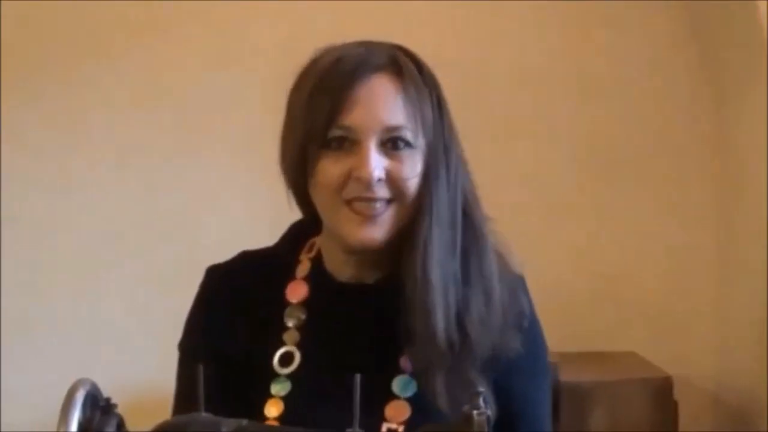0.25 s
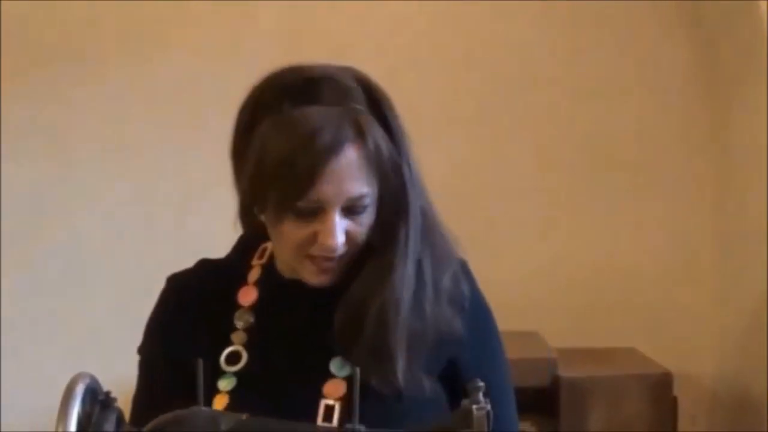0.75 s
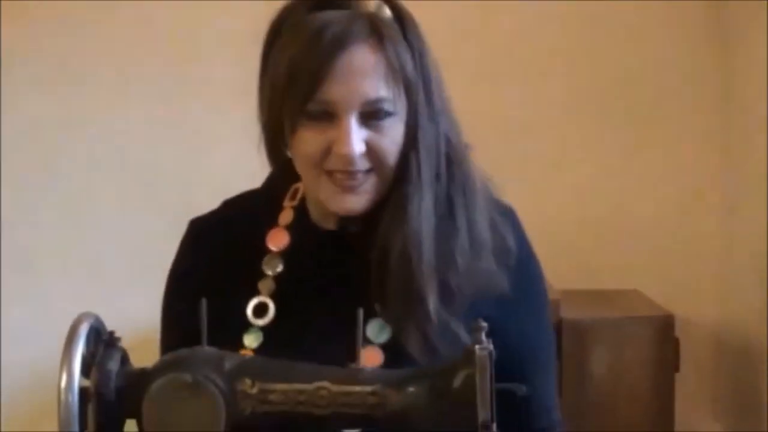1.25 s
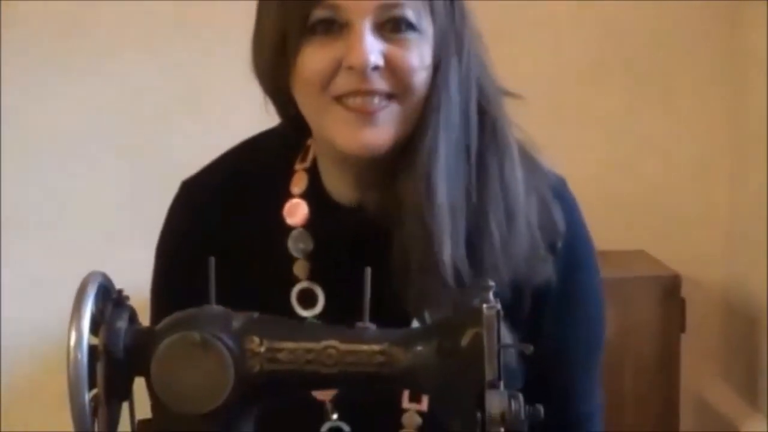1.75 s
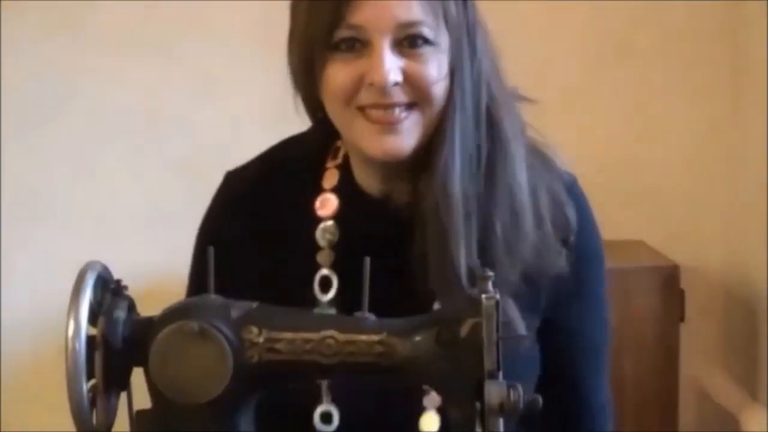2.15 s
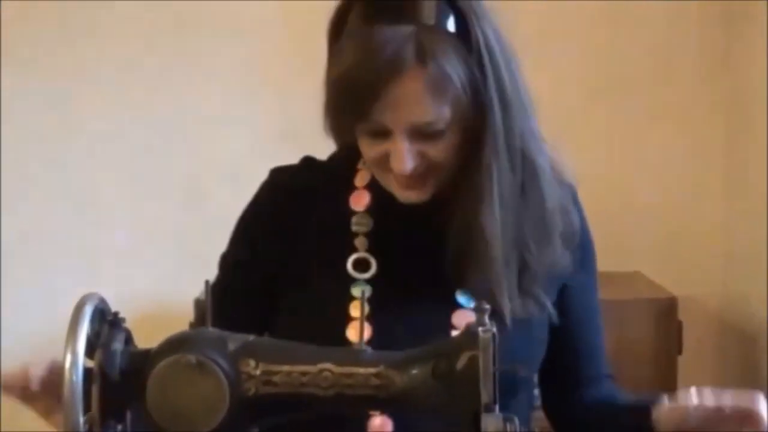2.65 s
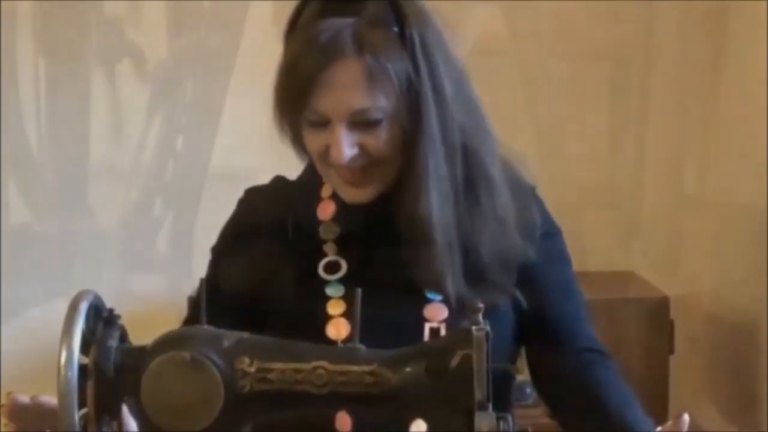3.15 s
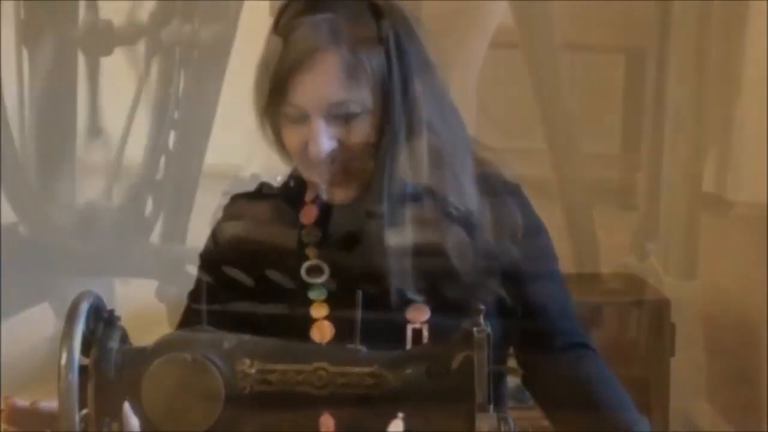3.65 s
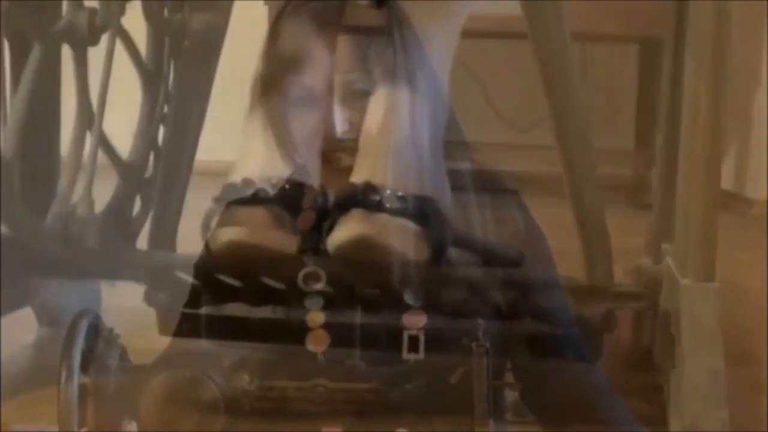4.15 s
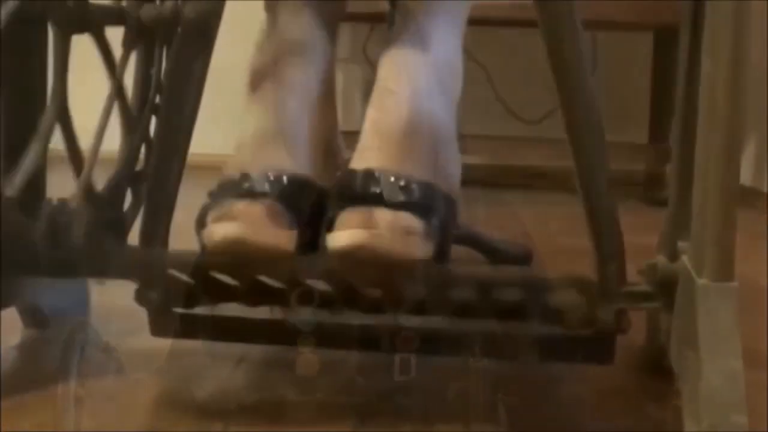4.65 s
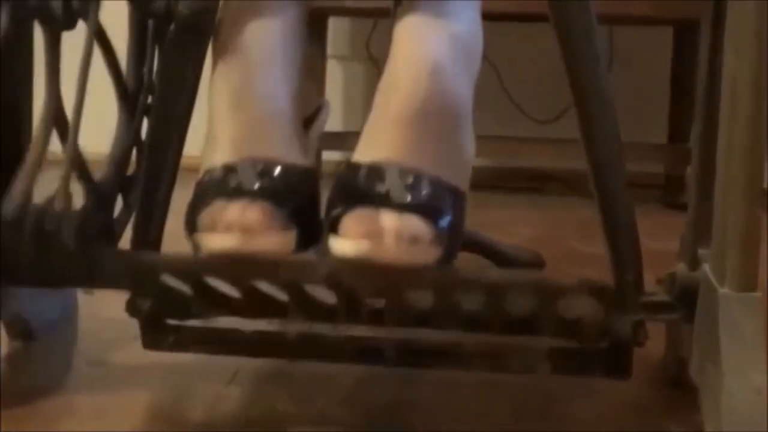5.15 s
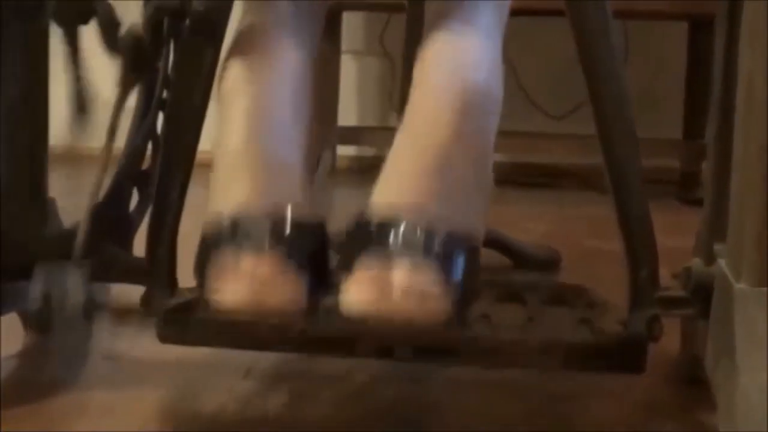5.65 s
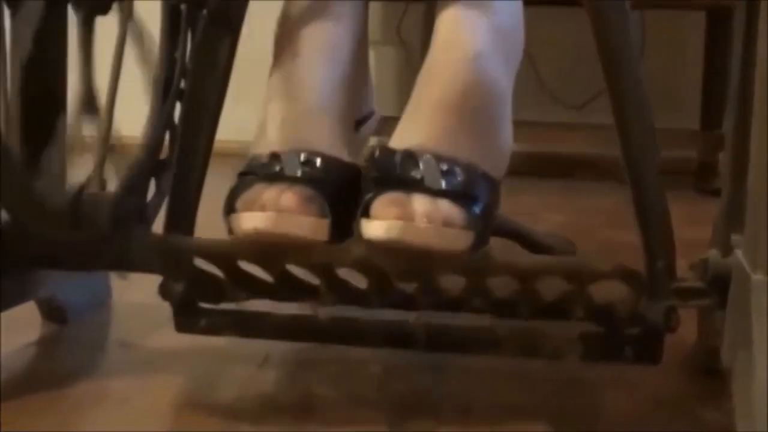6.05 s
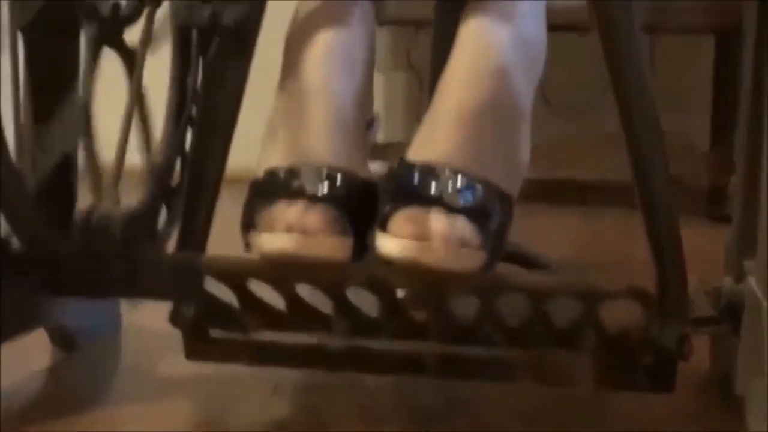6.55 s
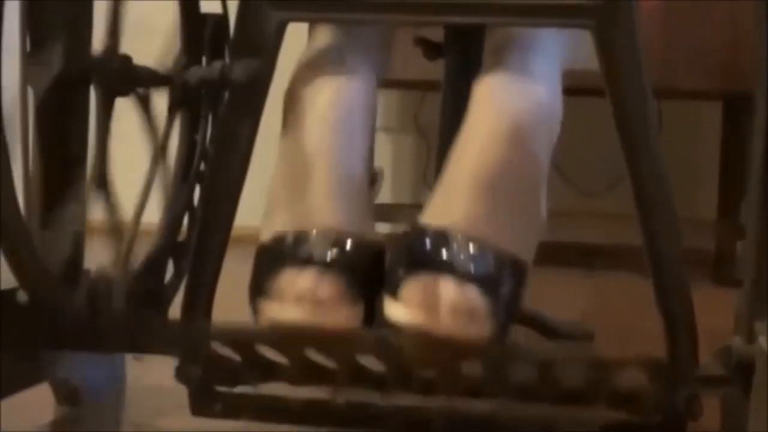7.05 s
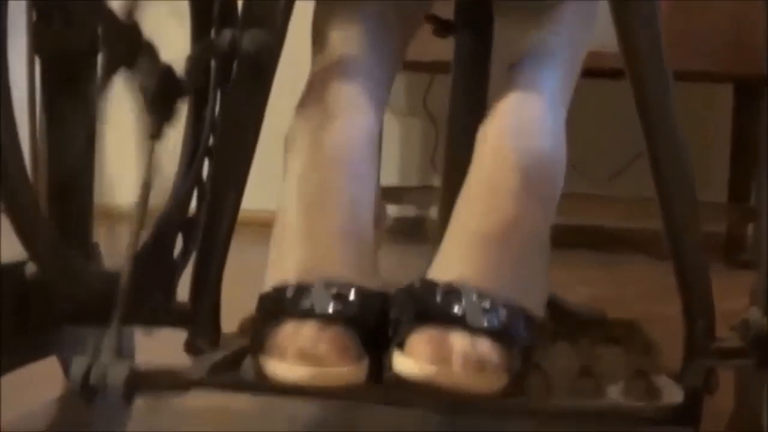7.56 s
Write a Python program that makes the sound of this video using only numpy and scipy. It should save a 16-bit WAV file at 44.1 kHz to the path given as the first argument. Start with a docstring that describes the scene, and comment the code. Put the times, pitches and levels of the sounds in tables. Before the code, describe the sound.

An old treadle sewing machine knocks and clanks as it is handled, then is pedalled with slow, ringing iron knocks in an echoing room.

```python
"""An old cast-iron treadle sewing machine in a bare, echoing room, on a small camera's stereo microphone.
The head is handled first: it drops and rebounds on the wooden table, steel parts slide, a lever snaps
and rings. Then the feet rock the treadle: once a stroke its loose linkage touches, knocks, rebounds and
swings back with a thud. Every heavy blow shakes the frame, which rumbles on for a moment.
The microphone is far enough off to hear the room answer each blow."""
import sys
import numpy as np
from scipy import signal
from scipy.fft import rfft, irfft, next_fast_len
from scipy.io import wavfile
from scipy.ndimage import uniform_filter1d, minimum_filter1d, map_coordinates

SR = 44100
rng = np.random.default_rng(int(sys.argv[2]) if len(sys.argv) > 2 else 0)


def inscribe(sig):
    """Save sig as 16-bit PCM at rate SR to the path in sys.argv[1].

    A 1-D sig is mono; a 2-D sig holds one channel per row.
    Samples are clipped to [-1, 1] before scaling.
    """
    pcm = np.round(np.clip(np.atleast_2d(sig).T, -1, 1) * 32767)
    wavfile.write(sys.argv[1], SR, pcm.astype(np.int16))


N = 343980
NOW = np.arange(N) / SR  # seconds through the scene
T = np.arange(SR) / SR  # seconds through one event
HZ = np.fft.rfftfreq(2 * SR, 1 / SR)
RUN_START_S = 4.85  # the treadle starts to move


def amp(db):
    """Decibels to gain."""
    return 10 ** (np.asarray(db) / 20)


def unit(x):
    """Scale to rms 1."""
    return x / np.sqrt(np.mean(x ** 2) + 1e-20)


def along(points, hz):
    """(Hz, value) points read on a log axis."""
    point_hz, values = np.transpose(points)
    return np.interp(np.log(hz + 1), np.log(point_hz + 1), values)


def fade(t60):
    """One second of exponential decay, falling 60 dB in t60 seconds."""
    return np.exp(-np.log(1000) * T / t60)


def swell(start, end, ramp):
    """0 to 1 and back: rises from start and falls from end, each over ramp seconds."""
    return np.clip((NOW - start) / ramp, 0, 1) - np.clip((NOW - end) / ramp, 0, 1)


def add(out, s, x):
    """Mix x into out from time s on."""
    part = out[:, round(s * SR):][:, :x.shape[-1]]
    part += x[..., :part.shape[1]]


def coloured(x, gain):
    """Causal filter of unit power, shaped by gain on the HZ grid."""
    cepstrum = irfft(np.log(np.maximum(unit(gain), 1e-6)))
    cepstrum[1:SR] *= 2  # folding the cepstrum gives minimum phase
    cepstrum[SR + 1:] = 0
    return irfft(rfft(x, 2 * SR) * np.exp(rfft(cepstrum)))[..., :SR]


# The room's width at the microphone. Each row: frequency in Hz, side relative to mid in dB.
ROOM_WIDTH = [(25, -13), (60, -35), (130, -43), (280, -29), (1000, -7.5), (4000, -5), (10000, -7.5)]
def diffuse(size):
    """Stereo noise from all round the room, nearly mono in the bass."""
    mid, side = rfft(rng.standard_normal((2, size)))
    side = side * amp(along(ROOM_WIDTH, np.fft.rfftfreq(size, 1 / SR)))
    return irfft(np.array([mid + side, mid - side]), size)


def steady(spectrum):
    """Steady stereo noise of rms 1, shaped by (Hz, dB) points."""
    gain = amp(along(spectrum, np.fft.rfftfreq(N, 1 / SR)))
    return unit(irfft(rfft(diffuse(N)) * gain, N))


# The echo of the bare room. Each row: frequency in Hz, t60 in seconds.
ROOM_DECAY = [(80, 1), (210, 0.56), (560, 0.54), (1470, 0.55), (3880, 0.61), (10000, 0.39)]
def room_tail(build_cycles):
    """The room's answer: each frequency dies at its own speed, and the bass builds slowest."""
    hz, t, noise = signal.stft(diffuse(SR), SR, nperseg=256)
    decay = np.exp(-np.log(1000) * t / along(ROOM_DECAY, hz)[:, None])
    onset = 1 - np.exp(-t * np.maximum(hz, 100)[:, None] / build_cycles)
    return signal.istft(noise * decay * onset, SR, nperseg=256)[1][:, :SR]


def ripple(spacing_hz):
    """A body's countless weak resonances: a random curve over frequency."""
    return map_coordinates(rng.standard_normal(2000), [HZ / spacing_hz], mode="nearest")


def blows(contacts, spectrum, modes, contact_t60, build_cycles, ripple_db, knee_hz):
    """Each contact shakes a body briefly and fills the room; a harder one is brighter above the knee."""
    out = np.zeros((2, N))
    resonances_db = sum(db / (1 + (2 * (HZ - hz) / width) ** 2) for hz, width, db, *_ in modes)
    body_db = along(spectrum, HZ) + resonances_db + ripple_db * ripple(45.21) * HZ / (HZ + 700)
    octaves = np.log2(np.maximum(HZ / knee_hz, 1))
    hollow_hz, hollow_octaves = 634, 0.42  # the band lifted by a blow on the middle of a panel
    hollow = np.exp(-(np.log2((HZ + 1) / hollow_hz) / hollow_octaves) ** 2)
    for s, db, direct_db, hollow_db, brightness in contacts:
        direct = amp(direct_db) * fade(contact_t60) * rng.standard_normal(SR)
        colour = amp(body_db + hollow_db * hollow + brightness * octaves)
        add(out, s, amp(db) * coloured(direct + room_tail(build_cycles), colour))
    return out


def rebounds(s, db, hollow_db, brightness, flight_s, loss_db, direct_db, dulling, touch_s, touch_db):
    """Contacts of a loose blow: a light touch, the hit, then two ever quicker, weaker, duller rebounds."""
    shrink = .68  # each flight over the one before
    contacts = [(s - touch_s, db + touch_db, direct_db, hollow_db, brightness - dulling)]
    for k in range(3):
        contacts.append((s, db - k * loss_db, direct_db, hollow_db, brightness - k * dulling))
        s += flight_s * shrink ** k
    return contacts


# Room tone and hiss around the microphone. Each row: frequency in Hz, relative level in dB.
AIR_SPECTRUM = [(12, -63), (20, -14), (85, 6.5), (174, -2), (210, 6.5), (239, 4.5), (1140, -5.5),
                (2320, -11.5), (2570, -11), (3100, -19), (3350, -10.5), (4030, -16), (9640, -39),
                (11000, -48.5), (14300, -73), (22000, -120)]
HISS_SPECTRUM = [(500, -15), (2000, 6.5), (5000, 1), (9500, 3.5), (11000, 0)]
def background(air_db=-58, hiss_db=-63, whine_db=-64, pip_period_s=.04, pip_width_s=0.0048):
    """Room air, a hiss that comes and goes, and a faint electrical whine pulsing 25 times a second."""
    from_pip_s = (NOW + .009) % pip_period_s - pip_period_s / 2
    pips = np.exp(-(from_pip_s / pip_width_s) ** 2 / 2)
    whine = steady([(2300, -64), (2560, -5), (2660, -10.5), (2850, -30),
                    (3200, -25), (3380, -7), (3600, -50)])
    whine_gain = amp(whine_db + 6 * swell(start=0.25, end=6.3, ramp=.15))
    hiss_gain = amp(hiss_db + 8 * swell(start=1.16, end=3.7, ramp=0.067))
    air = amp(air_db) * steady(AIR_SPECTRUM)
    return air + hiss_gain * steady(HISS_SPECTRUM) + whine_gain * pips * whine


# The frame's rumble and the deep bass under it. Each row: frequency in Hz, relative level in dB.
FRAME_SPECTRUM = [(25, -22), (60, -15.5), (110, -4), (180, -11.5), (280, 1), (450, -13), (900, -15.5),
                  (3000, -33)]
DEEP_SPECTRUM = [(20, 3), (38, -5), (60, 6.5), (90, -23), (200, -37)]
def frame_rumble(knock_shake_db=-24, stroke_shake_db=-32, settle_db_per_s=22, deep_floor_db=-72):
    """The frame rumbles while it is shifted, after every heavy blow, and while the flywheel turns."""
    jolts = [(s, db + knock_shake_db) for s, db, *_ in HEAD_KNOCKS]
    jolts += [(s, db + stroke_shake_db) for s, db, *_ in TREADLE_STROKES]
    jolt_power = sum((NOW > s) * amp(db - settle_db_per_s * np.abs(NOW - s)) ** 2 for s, db in jolts)
    handled = amp(-54) * swell(start=-1, end=0.57, ramp=0.27)
    running = amp(-56) * swell(start=RUN_START_S, end=NOW[-1], ramp=0.17)
    motion = np.sqrt(jolt_power + handled ** 2 + running ** 2)
    deep_gain = np.hypot(amp(-8) * motion, amp(deep_floor_db))
    return motion * steady(FRAME_SPECTRUM) + deep_gain * steady(DEEP_SPECTRUM)


# Small loose parts, sounding close and dry. Each row: start in seconds, level in dB, pitch in Hz.
PART_CLICKS = [(0.310, -35, 2530), (0.314, -26, 3900), (1.704, -25.5, 4170), (2.299, -22, 4040),
               (2.308, -16.5, 7400), (4.935, -40.5, 4870), (5.2331, -19.5, 3330), (5.2345, -26, 8800),
               (5.4785, -23.5, 3900), (6.5005, -17.5, 5200), (6.801, -30, 3900), (7.105, -17.5, 3370)]
def clicks(t60=0.03, room_db=-30):
    """Loose parts click: short bursts that fall away above their pitch, with hardly any room."""
    out = np.zeros((2, N))
    for s, db, hz in PART_CLICKS:
        spectrum = [(300, -25), (800, -1), (hz * 1.14, -3), (hz * 1.18, 0), (hz * 1.53, -16), (12500, -23)]
        snap = fade(t60) * rng.standard_normal(SR)
        echo = amp(room_db) * room_tail(build_cycles=2)
        add(out, s, amp(db) * coloured(snap + echo, amp(along(spectrum, HZ))))
    return out


# Feet and treadle plate, down by the floor.
# Each row: start in seconds, level in dB, brightness in dB per octave, boom pitch in Hz.
FOOT_THUDS = [(0.403, -28.5, -2, 159), (0.495, -38.5, 3.5, 252), (1.297, -46.5, 3.5, 330),
              (1.962, -23, 1, 200), (3.089, -38, 2, 322), (3.485, -38.5, -0.5, 202),
              (4.303, -38.5, 2.5, 101), (4.855, -36.5, -1, 255), (4.970, -32.5, 2.5, 265),
              (5.028, -25.5, 1, 108), (6.311, -41.5, -2, 260), (7.237, -33, 1, 266), (7.763, -38.5, 3, 267)]
# The colour of a soft blow. Each row: frequency in Hz, relative level in dB.
THUD_SPECTRUM = [(40, -27.5), (80, -12), (140, -5), (270, -3.5), (400, -4), (600, -18), (1200, -32),
                 (4000, -50), (11000, -62)]
# The wooden table's modes. Each row: frequency in Hz, width in Hz, lift in dB.
TABLE_MODES = [(197, 98, 5), (269, 14.7, 6), (351.2, 5.8, 9.5), (634, 13, 0), (760, 74, 1), (1430, 54, 1.5),
               (1830, 37, -11)]
def thuds(backswing_s=.318, plate_direct_db=4, plate_brightness=-0.84):
    """Feet thud on the treadle, and so does its plate as it swings back after each stroke."""
    feet = [(s, db, 0, 0, brightness) for s, db, brightness, _ in FOOT_THUDS]
    plate = [(s + backswing_s, db, plate_direct_db, 0, plate_brightness) for s, *_, db in TREADLE_STROKES]
    return blows(feet + plate, THUD_SPECTRUM, TABLE_MODES,
                 contact_t60=0.038, build_cycles=0.99, ripple_db=5.5, knee_hz=100)


def table_booms(t60=0.17, rise_s=0.0037, room_db=-15, thud_boom_db=2.5, lever_kick=(2.385, -11, 403)):
    """Knocks, thuds and the lever's kick each swing the tabletop at one low pitch; the room takes it up."""
    out = np.zeros((2, N))
    swings = [(s, db, hz) for s, *_, db, hz in HEAD_KNOCKS]
    swings += [(s, db + thud_boom_db, hz) for s, db, _, hz in FOOT_THUDS]
    for s, db, hz in swings + [lever_kick]:
        swing = fade(t60) * (1 - np.exp(-T / rise_s)) * np.sin(2 * np.pi * hz * T)
        band = 1 / (1 + (4 * (HZ / hz - 1)) ** 4)
        echo = coloured(room_tail(build_cycles=0.26), band)
        add(out, s, amp(db) * (swing + amp(room_db) * echo))
    return out


# Hands and sleeves on the machine. Each row: middle in seconds, half length in seconds, level in dB.
SLEEVE_BRUSHES = [(0.85, 0.046, -47), (1.248, 0.047, -65), (1.44, 0.093, -49), (2.933, 0.039, -48)]
# The colour of rubbing cloth. Each row: frequency in Hz, relative level in dB.
CLOTH_SPECTRUM = [(500, -18), (2000, 0), (5000, -5), (8500, -0.5), (11000, -2.5)]
def brushes(grain_db=3):
    """Cloth rubs over the iron: a grainy hiss that swells and fades with each movement."""
    pressure = sum(amp(db) * np.exp(-((NOW - s) / half) ** 2) for s, half, db in SLEEVE_BRUSHES)
    grain = amp(grain_db * unit(uniform_filter1d(rng.standard_normal(N), size=200)))
    return pressure * unit(grain * steady(CLOTH_SPECTRUM))


# The head landing on the tabletop. Each row: start in seconds, level in dB, hollowness in dB, brightness
# in dB per octave, first flight in seconds, loss per rebound in dB, boom level in dB, boom pitch in Hz.
HEAD_KNOCKS = [(0.838, -22.5, 10.5, -0.5, 0.032, 8, -19.5, 259.5),
               (1.446, -26, 8.5, -6, 0.051, 4.5, -30, 274), (1.607, -18, 1.5, -5, 0.036, 5, -13, 260),
               (2.210, -26, 3, -0.5, 0.034, 2, -13, 128), (2.313, -15, 4.5, 3.2, 0.051, 2.5, -11, 155.4),
               (6.643, -23, 5.5, -4.5, 0.034, 15, -13.5, 501)]
# The colour of struck wood. Each row: frequency in Hz, relative level in dB.
WOOD_SPECTRUM = [(29, -72), (50, -41), (126, -9), (266, -0.5), (436, -3.5), (878, -9.5), (1100, -14.5),
                 (1770, -14), (1940, -15), (3480, -30.5), (5850, -45), (8020, -40), (11000, -61.5),
                 (14300, -53), (22000, -120)]
def head_knocks():
    """The head drops on its wooden table and rebounds."""
    contacts = []
    for *knock, _, _ in HEAD_KNOCKS:
        contacts += rebounds(*knock, direct_db=5.5, dulling=0.99, touch_s=0.022, touch_db=-21)
    return blows(contacts, WOOD_SPECTRUM, TABLE_MODES,
                 contact_t60=0.08, build_cycles=3.3, ripple_db=3.0, knee_hz=565)


# Hollow taps, and the lever's clank at 2.365 s. Each row: start in seconds, level in dB, lift of the
# direct sound at the microphone in dB, brightness in dB per octave.
TAPS_AND_CLANK = [(1.4466, -30, 13, -2), (2.365, -31, 7, 6), (3.3233, -29, 15, -1.3), (4.077, -44, 11, -1),
                  (4.244, -39.5, 1.5, 4), (5.023, -44, 20.5, 1), (7.418, -38.5, 10.5, -3.5),
                  (7.490, -40.5, 12.5, 2.5)]
# Their hollow colour. Each row: frequency in Hz, relative level in dB.
HOLLOW_SPECTRUM = [(100, -25), (420, -9.5), (700, 6), (1150, -2.5), (1650, -4.5), (2300, -16), (3200, -25),
                   (4700, -33.5), (7000, -42), (11000, -49)]
def taps_and_clank():
    """Short hollow taps, and the bright clank of the lever snapping home."""
    contacts = [(s, db, direct_db, 0, brightness) for s, db, direct_db, brightness in TAPS_AND_CLANK]
    return blows(contacts, HOLLOW_SPECTRUM, TABLE_MODES,
                 contact_t60=0.032, build_cycles=1.8, ripple_db=3.5, knee_hz=500)


# The colour of the steel parts in the head. Each row: frequency in Hz, relative level in dB.
STEEL_SPECTRUM = [(180, -30), (300, 2.5), (464, -6.5), (667, 5.5), (719, -4), (836, 0), (1160, -9.5),
                  (1440, -2.5), (1650, -11.5), (2190, -6), (2880, -12), (3400, -7.5), (4870, -16.5),
                  (9180, -17), (11000, -26), (14300, -84), (22000, -120)]
# Their modes. Each row: frequency in Hz, width in Hz, lift in dB.
STEEL_MODES = [(1456, 19, 5.5), (2260, 47, 4), (3280, 28, 4), (3600, 31, 7), (3600, 18, -3), (3937, 25, 12),
               (7900, 130, -3)]
def steel_slide(s=1.892, length_s=.088, slowing=1.75, db=-19.5, brightness=3.5, dulling=1.44, count=5):
    """Steel touches steel and slides: contacts come ever slower and duller as it settles."""
    contacts = [(s - 0.0086, db - 11, 0, 0, brightness)]  # the light first touch
    for k in range(count):
        delay_s = length_s * (k / (count - 1)) ** slowing
        direct_db = 4 - k * 2.2
        contacts.append((s + delay_s, db + k * 0.19, direct_db, 0, brightness - k * dulling))
    return blows(contacts, STEEL_SPECTRUM, STEEL_MODES,
                 contact_t60=0.034, build_cycles=17.5, ripple_db=1.5, knee_hz=550)


# The lever's modes. Each row: frequency in Hz, level in dB, t60 in seconds.
LEVER_MODES = [(2300, -29, .15), (2704, -21, .56), (2735, -34, .3), (3370, -38, .35), (4140, -32, .35),
               (4212, -29, .55), (8500, -45, .25)]
def lever(s=2.365, waver_depth=.45, rise_s=0.0022):
    """A sprung steel lever snaps home; reflections make each of its modes waver a little."""
    ring = np.zeros((2, SR))
    for hz, db, t60 in LEVER_MODES:
        slow_noise = uniform_filter1d(uniform_filter1d(diffuse(SR), size=700), size=500)
        waver = waver_depth * unit(slow_noise)
        ring += amp(db) * fade(t60) * (1 + waver) * np.sin(2 * np.pi * hz * T + 2 * waver[::-1])
    out = np.zeros((2, N))
    add(out, s, ring * (1 - np.exp(-T / rise_s)))
    return out


# The ticks that reach the microphone most clearly. Each row: start in seconds, relative level in dB.
CLEAR_TICKS = [(4.9645, -37.5), (5.984, -36), (6.5864, -25), (7.044, -32), (7.25, -40.5), (7.5917, -30.5),
               (7.723, -39)]
# Their thin colour. Each row: frequency in Hz, relative level in dB.
TICK_SPECTRUM = [(1000, -4), (4000, -11.5), (7500, -5), (9000, 4.5), (9500, -2), (10000, 5.5), (11000, -10)]
def ticks(t60=0.092, gain_db=-4, room_db=-14, faint_db=-47, faint_count=7):
    """The running mechanism ticks thinly, with fainter ticks at random among the clear ones."""
    out = np.zeros((2, N))
    colour = amp(along(TICK_SPECTRUM, HZ))
    faint = [(s, faint_db) for s in rng.uniform(RUN_START_S, NOW[-1], faint_count)]
    for s, db in CLEAR_TICKS + faint:
        snap = fade(t60) * rng.standard_normal(SR)
        echo = amp(room_db) * room_tail(build_cycles=2)
        add(out, s, amp(db + gain_db) * coloured(snap + echo, colour))
    return out


# The linkage under the table. Each row: start in seconds, level in dB, brightness in dB per octave,
# first flight in seconds, loss per rebound in dB, level of the backswing thud in dB.
TREADLE_STROKES = [(5.196, -16, 2.3, 0.037, 2, -51), (5.832, -17, 0.65, 0.029, 6, -45.5),
                   (6.483, -13, 1.64, 0.072, 5.5, -34), (7.105, -14.5, 0.3, 0.026, 3, -31.5)]
# The colour of cast iron. Each row: frequency in Hz, relative level in dB.
IRON_SPECTRUM = [(29, -59), (50, -17), (95, -7.5), (135, -2), (162, -5), (408, 2), (467, -7), (559, -6.5),
                 (898, -6), (1010, -5), (1230, -10), (1940, -15), (4560, -34), (10300, -38.5), (11000, -45),
                 (14300, -84), (22000, -120)]
def treadle():
    """Once a stroke the linkage takes up its slack and knocks through the iron stand."""
    contacts = []
    for s, db, brightness, flight_s, loss_db, _ in TREADLE_STROKES:
        contacts += rebounds(s, db, 1.5, brightness, flight_s, loss_db,
                             direct_db=2.5, dulling=2.6, touch_s=.036, touch_db=-24.5)
    knocks = blows(contacts, IRON_SPECTRUM, STAND_MODES,
                   contact_t60=0.13, build_cycles=6.2, ripple_db=0, knee_hz=480)
    return knocks + stand_ring(contacts)


# The iron stand's modes. Each row: frequency in Hz, width in Hz, lift in dB, ring relative to the
# knock in dB, t60 of the ring in seconds.
STAND_MODES = [(133.3, 14, 7, -18, 0.45), (248, 76, 3, -37, 0.93), (327.5, 10, 5.5, -31, 0.34),
               (408.7, 12, 5, -13, 1), (574, 41, 8, -30, 0.35), (732, 37, 1.5, -12, 0.46),
               (982, 58, 7.5, -14, 0.63), (1024, 24, 0.5, -34, 0.33), (1305, 17, 5, -29, 0.31),
               (1570, 87, 3, -23.5, 0.61), (1880, 42, 4.5, -46, 0.48), (2250, 48, 7, -38, 0.6),
               (2360, 20, 6, -37, 0.89)]
def stand_ring(contacts, rise_s=0.0058):
    """After each knock the iron stand rings on, each mode at a new phase."""
    out = np.zeros((2, N))
    hz, _, _, mode_db, t60 = np.transpose(STAND_MODES)
    tones = np.exp(2j * np.pi * hz[:, None] * T) * fade(t60[:, None]) * (1 - np.exp(-T / rise_s))
    for s, db, *_ in contacts:
        phase = rng.uniform(0, 2 * np.pi, len(hz)) + .5 * rng.standard_normal((2, len(hz)))
        weights = amp(db + mode_db) * np.exp(1j * phase)
        add(out, s, (weights @ tones).real)
    return out


def scene():
    """The machine in its room, as it reaches the microphone."""
    struck = treadle() + thuds() + head_knocks() + taps_and_clank() + steel_slide()
    ringing = table_booms() + lever()
    return struck + ringing + clicks() + ticks() + brushes() + frame_rumble() + background()


def limited(x, ceiling=0.51):
    """A fast limiter holds down the loudest peaks."""
    needed_gain = np.minimum(1, ceiling / (np.abs(x).max(axis=0) + 1e-9))
    return x * uniform_filter1d(minimum_filter1d(needed_gain, size=260), size=180)


# The difference between the microphone's two close ports.
# Each row: frequency in Hz, gain of a side signal a quarter cycle ahead of the mid.
PORT_DIFFERENCE = [(30, .05), (70, .16), (140, .32), (450, .44), (1000, .24), (3000, .1), (6000, .01)]
def record(dry, start_s=.15, top_hz=11150):
    """The camera starts a moment late, widens its two close ports, limits, and cuts the top treble."""
    size = next_fast_len(N + SR // 2)
    hz = np.fft.rfftfreq(size, 1 / SR)
    pair = rfft(dry * (NOW > start_s), size)
    side = 1j * along(PORT_DIFFERENCE, hz) * pair.mean(axis=0)
    held = limited(irfft(pair + np.array([side, -side]), size))
    low_pass = 1 / np.sqrt(1 + (hz / top_hz) ** 130)
    return irfft(rfft(held) * low_pass, size)[:, :N]


dry = scene()
out = record(dry)
inscribe(out)
```